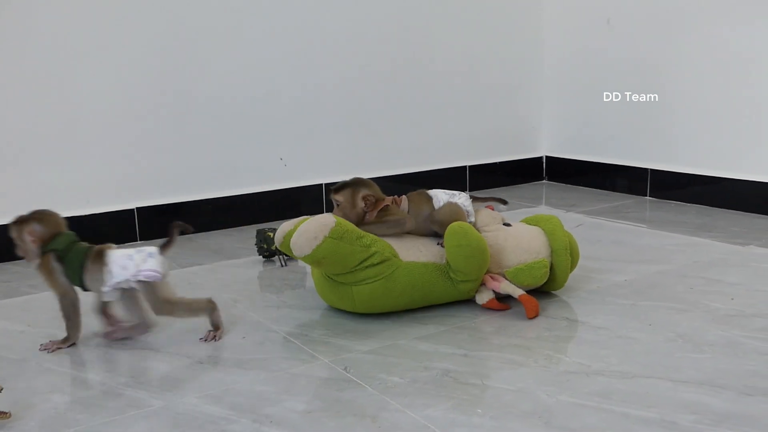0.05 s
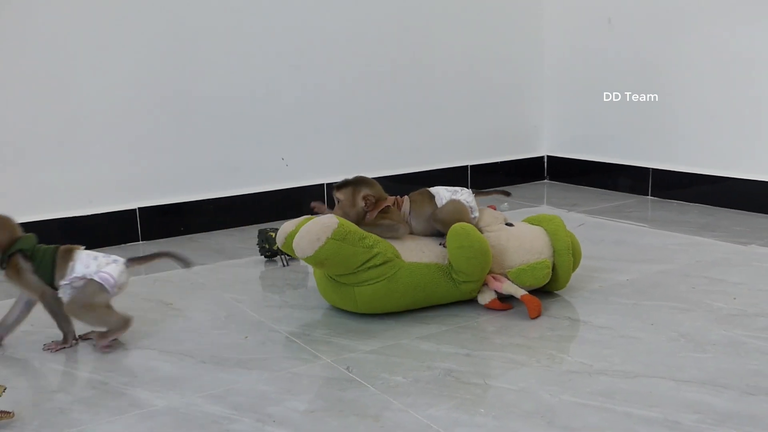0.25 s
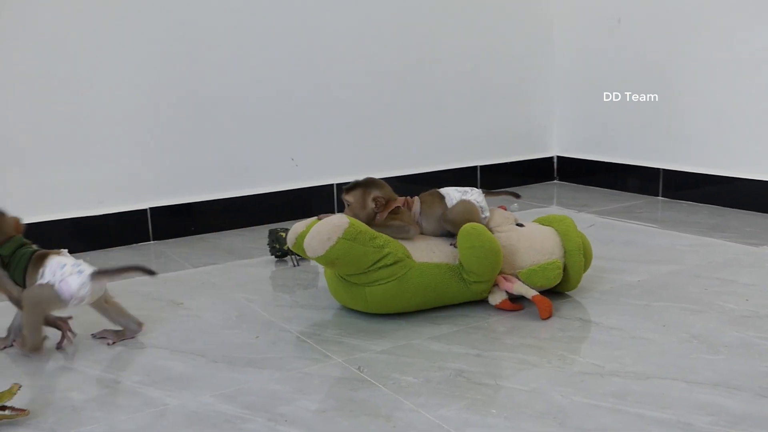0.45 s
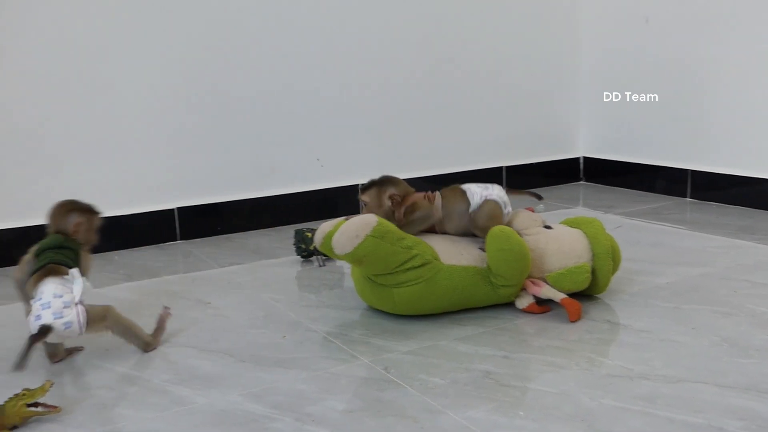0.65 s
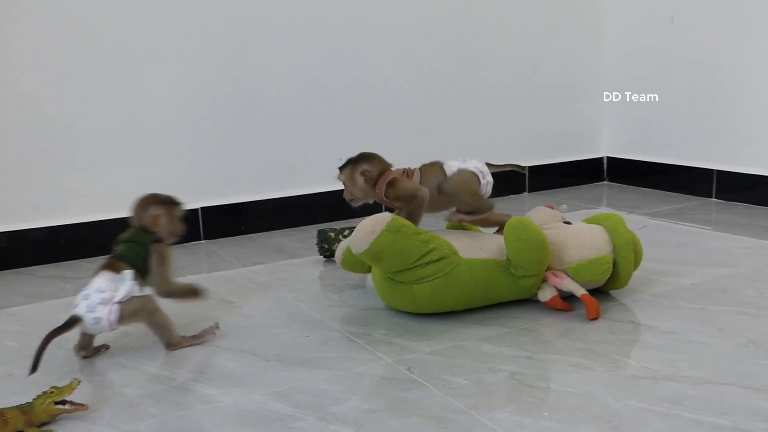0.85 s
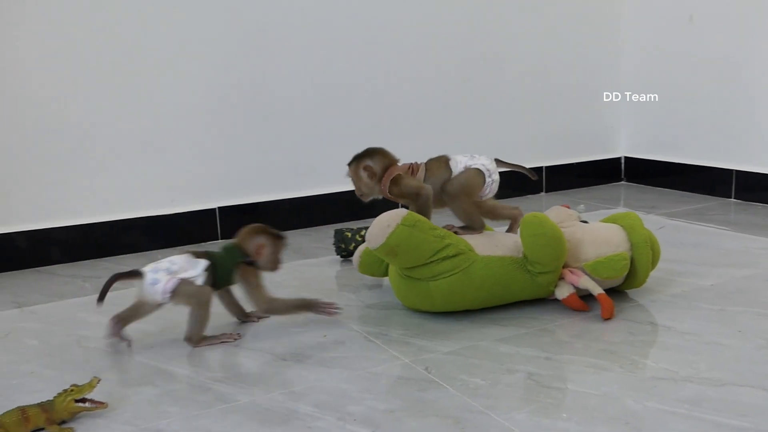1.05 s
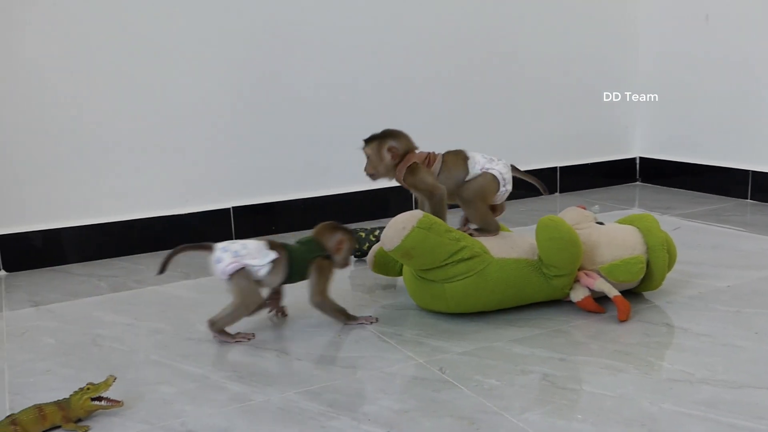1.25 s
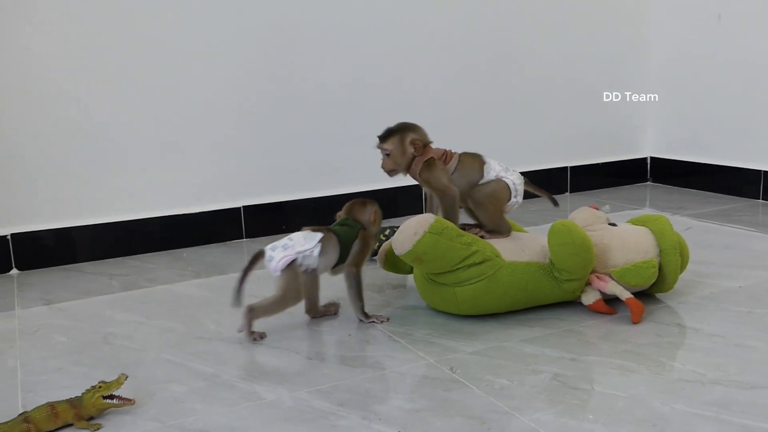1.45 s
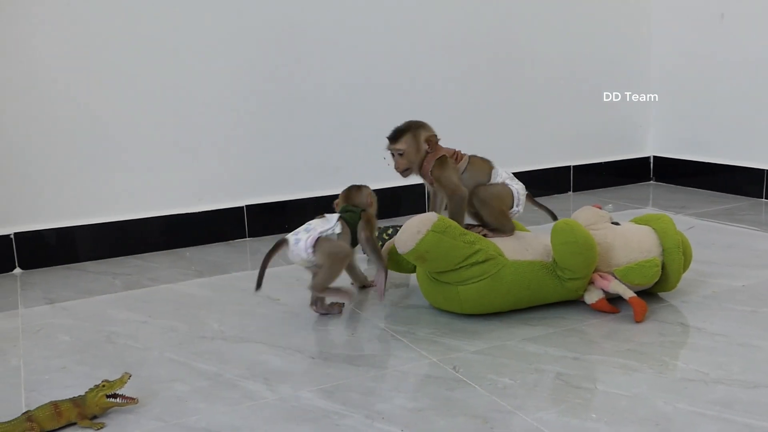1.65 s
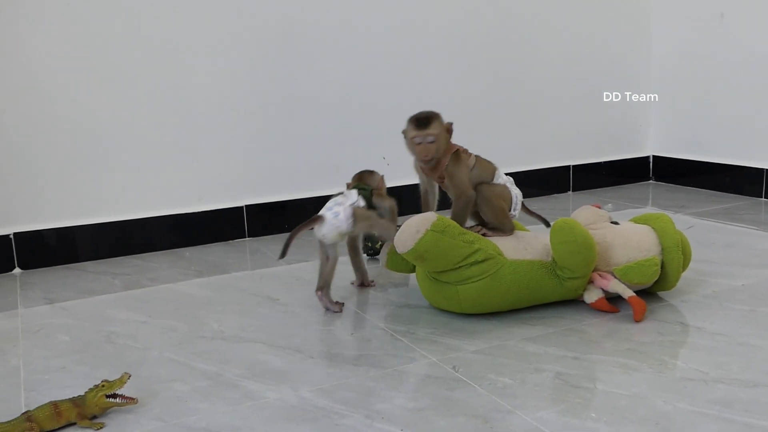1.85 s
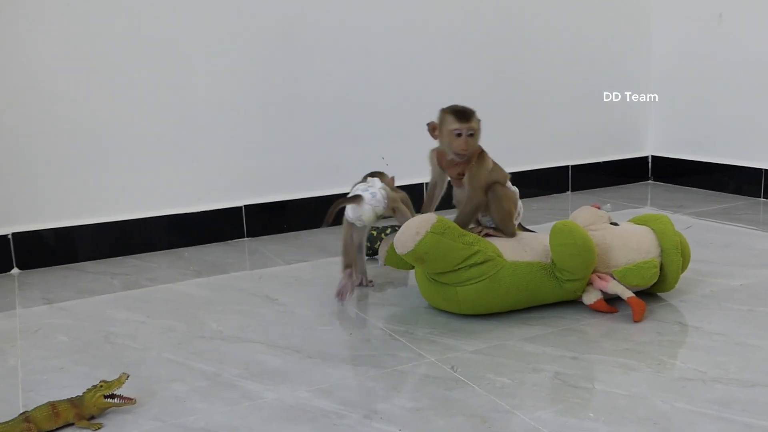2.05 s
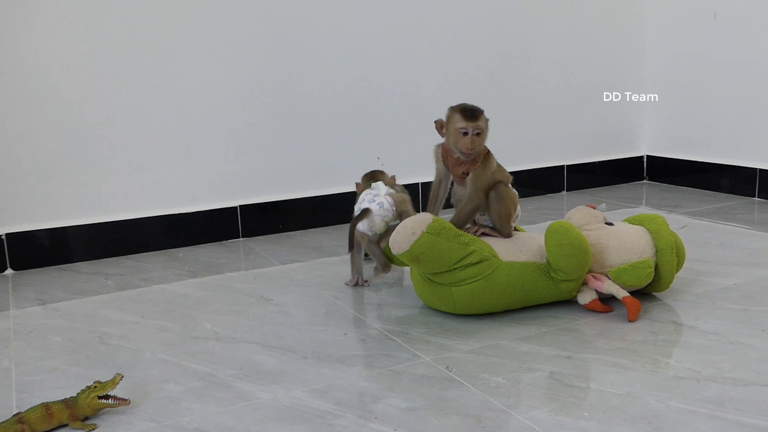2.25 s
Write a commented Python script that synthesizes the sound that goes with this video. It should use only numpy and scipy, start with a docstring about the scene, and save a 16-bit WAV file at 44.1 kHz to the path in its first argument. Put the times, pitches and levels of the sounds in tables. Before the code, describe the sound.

Piercing monkey squeals come in two brief bursts with a weak squeak between, each leaving a bright echo off hard walls; low traffic swells and quiet room tone lie behind, heard in wide stereo from some distance.

```python
"""In a bare tiled room with a long bright echo, young monkeys squeal, after the fading echo of an earlier squeal.
Each squeal is a stack of shaking partials mixed with pulsing breath noise and coloured by a moving mouth.
Behind them shaped noise makes distant swelling traffic, a lumpy rumble and steady room tone;
the microphone pair hears the low background almost in opposite phase. A thin far whistle, nearly a sine, passes."""
import sys
import numpy as np
from scipy import signal
from scipy.fft import rfft, irfft
from scipy.io import wavfile
from scipy.ndimage import uniform_filter1d

SR = 44100
rng = np.random.default_rng(int(sys.argv[2]) if len(sys.argv) > 2 else 0)


def convert_level_to_amplitude(level_db):
    """Map a level in decibels to its linear amplitude factor."""
    exponent = np.asarray(level_db, float) / 20
    return 10 ** exponent


def master(y):
    """Save y as 16-bit WAV."""
    cut = np.clip(np.atleast_2d(y).T, -1, 1)
    pcm = np.round(cut * 32767)  # scale
    wavfile.write(sys.argv[1], SR, pcm.astype(np.int16))


N = 101429   # length in samples


def rms_one(x):
    """Scale to rms 1."""
    return x / np.sqrt(np.mean(x ** 2) + 1e-20)


def at_hz(points, hz):
    """Read the second column of a table on a log-frequency axis."""
    table = np.array(points)
    return np.interp(np.log(hz + 1), np.log(table[:, 0]), table[:, 1])


def drift(rate_hz, size):
    """Slow random movement of rms 1: white noise through two equal one-pole low-passes."""
    r = np.exp(-2 * np.pi * rate_hz / SR)
    slow = signal.lfilter([1], [1, -2 * r, r * r], rng.standard_normal(size + SR))
    return rms_one(slow[SR:])   # the first second lets the filter settle


def band_pass(x, low_hz, high_hz):
    """Keep one band of a sound with a Butterworth filter."""
    return signal.sosfilt(signal.butter(2, [low_hz, high_hz], "band", fs=SR, output="sos"), x)


def coloured(x, spectrum):
    """Shape a sound by a dB spectrum."""
    size = x.shape[-1]
    hz = np.arange(size // 2 + 1) * SR / size
    return irfft(rfft(x) * convert_level_to_amplitude(at_hz(spectrum, hz)), size)


MOST_OPPOSED = -0.86   # lowest left-right likeness; -1 would be exact opposite phase


def pair(mid, side, likeness, balance):
    """Left and right from two unrelated sounds: their mid/side mix sets likeness and balance per frequency."""
    size = len(mid)
    hz = np.arange(size // 2 + 1) * SR / size
    alike = np.clip(at_hz(likeness, hz), MOST_OPPOSED, 1)
    lean = convert_level_to_amplitude(at_hz(balance, hz) / 2)
    m = np.sqrt(0.5 + alike / 2) * rfft(mid)
    s = np.sqrt(0.5 - alike / 2) * rfft(side)
    return irfft(np.array([(m + s) * lean, (m - s) / lean]), size)


# stereo image of the room, shared by both echoes: f/Hz, left-right likeness
ROOM_LIKENESS = [(700, 0.36), (1100, 0.00059), (1600, 0.24), (3100, 0.83), (4200, 0.87), (6000, 1),
                 (7800, 0.93), (9000, 0.76), (12000, 0.32), (15000, 0.39)]
# lean of the room: f/Hz, left minus right level/dB
ROOM_BALANCE = [(700, 22), (1300, -14), (2400, -6), (4400, 0.5), (8000, -2), (15000, -0.5)]
EARLIER_HZ, EARLIER_WIDTH_HZ, EARLIER_T60_S = 6640, 1300, 0.75
EARLIER_DB, EARLIER_WIDE_DB = -60.5, -63   # narrow and wide noise, before the decay


def earlier_echo():
    """The dying echo of a high squeal that ended just before: two bands of noise in exponential decay."""
    white = rng.standard_normal((2, 2, N))
    half_width = EARLIER_WIDTH_HZ / 2
    narrow = band_pass(white[0], EARLIER_HZ - half_width, EARLIER_HZ + half_width)
    wide = band_pass(white[1], 3500, 11000)
    both = convert_level_to_amplitude(EARLIER_DB) * rms_one(narrow) + convert_level_to_amplitude(EARLIER_WIDE_DB) * rms_one(wide)
    decay = convert_level_to_amplitude(-60 * np.arange(N) / SR / EARLIER_T60_S)
    return pair(both[0], both[1], ROOM_LIKENESS, ROOM_BALANCE) * decay


# traffic swells: t/s, level/dB, extra left minus right level/dB for the whole background
TRAFFIC = [(0, -60, 4.5), (.3, -55, 6), (.6, -58.5, 6), (.9, -58, 3), (1.2, -58.5, 1.5), (1.45, -56.5, 2.5),
           (1.65, -52, 3.7), (1.95, -53.5, 3), (2.12, -51.5, 2.1), (2.3, -50.5, 3.1)]
# traffic tone: f/Hz, relative level/dB per Hz
TRAFFIC_COLOUR = [(25, -51), (45, -38), (100, -22.5), (180, -5), (230, -5.5), (300, -4.5), (700, -5),
                  (1300, -7.5), (2200, -17), (4000, -23), (8000, -29), (16000, -36.5)]
# room tone: f/Hz, relative level/dB per Hz
HISS_COLOUR = [(25, -19), (1000, 11), (4000, 9.2), (8000, -7.5), (11000, 4), (16000, -30)]
# stereo image of the background: f/Hz, left-right likeness (held at MOST_OPPOSED or above)
FAR_LIKENESS = [(60, -1.9), (130, -0.75), (290, -0.92), (640, -1.062), (1410, -0.78), (3100, -0.34),
                (6820, 0.41), (15000, 0.56)]
# lean of the background: f/Hz, left minus right level/dB
FAR_BALANCE = [(60, -4.5), (180, -8), (550, -9), (1650, -6.5), (4970, -4.5), (15000, 7)]
HISS_DB = -73.5
RUMBLE_TOP_HZ, RUMBLE_DB = 147, -75
RUMBLE_LUMPS_DB, RUMBLE_LUMPS_HZ = 2.5, 6   # depth (rms) and speed of the rumble's swells


def background():
    """Swelling traffic and a lumpy rumble over a steady room tone, all shaped noise."""
    s, level_db, lean_db = np.transpose(TRAFFIC)
    t = np.arange(N) / SR
    white = rng.standard_normal((4, N))
    traffic_db = np.interp(t, s, level_db) + 0.4 * drift(18, N)
    traffic = rms_one(coloured(white[:2], TRAFFIC_COLOUR)) * convert_level_to_amplitude(traffic_db)
    hiss = convert_level_to_amplitude(HISS_DB) * rms_one(coloured(white[2:], HISS_COLOUR))
    low = band_pass(white[2:, ::-1], 60, RUMBLE_TOP_HZ)   # reversed, so unlike the hiss
    rumble = rms_one(low) * convert_level_to_amplitude(RUMBLE_DB + RUMBLE_LUMPS_DB * drift(RUMBLE_LUMPS_HZ, N))
    far = traffic + hiss + rumble
    lean = convert_level_to_amplitude(np.interp(t, s, lean_db) * np.array([[0.5], [-0.5]]))
    return pair(far[0], far[1], FAR_LIKENESS, FAR_BALANCE) * lean


SHAKE, SHAKE_HZ = 0.1235, 202.4   # pitch shake at full roughness (rms share of pitch) and its speed
BREATH_DB = 5.0   # gain of the breath noise at full roughness
SHIMMER_DB, SHIMMER_HZ = 2.5, 75   # the strained voice wavers in strength: depth (rms) and speed
DULLING = 0.3   # treble loss for each dB under the squeal's peak, times log2(1 + f / 1 kHz), in dB
# one table per squeal: t/s, pitch f/Hz, level/dB, roughness (0-1), half-pitch line level/dB,
# mouth resonance shift (1 = none)
SQUEALS = [
    [(.136, 2243, -75, 0.1, -32, 0.42), (.146, 2554, -52.5, 0.17, -30, 1.07),
     (.158, 3068, -47.5, 0.31, -10, 0.99), (.172, 2857, -42, 0.49, 6, 0.97),
     (.185, 2675, -41.5, 0.48, -5, 0.97), (.2, 2668, -44.5, 0.59, -4, 0.99), (.21, 2700, -67, 0.7, -3, 1.3)],
    [(.216, 1518, -62, 0.11, -17, 0.43), (.228, 1636, -42, 0.25, -12, 1.09),
     (.245, 1592, -38, 0.34, -2, 1.02), (.27, 1623, -38, 0.28, -5, 1.03),
     (.288, 1664, -35, 0.36, -15, 1.01), (.296, 1670, -77, 0.1, -18, 3)],
    [(.284, 5570, -63, 0, -30, 0.87), (.295, 5640, -42.5, 0.2, -39, 1.1), (.325, 5880, -46, .15, -37, 1.3),
     (.335, 5920, -51, 0, -30, 1.3)],
    [(.308, 1629, -86, 0.25, -23, .98), (.322, 1682, -34.5, 0.3, -11, 1.15),
     (.335, 1647, -38, 0.39, -23, 0.99), (.35, 1722, -35, 0.38, -36, 1.032),
     (.385, 1606, -35.5, 0.3, -29, 0.934), (.395, 1647, -49, 0.18, -17, 0.77)],
    [(.697, 1469, -80, 0.04, -24, 1.7), (.71, 1486, -51.5, 0.12, -3, 1.03),
     (.722, 1529, -53, 0.1, -5, 1.03), (.733, 1606, -53.5, 0.15, -21, 1.08),
     (.746, 1687, -50, 0.2, -2, 1.03), (.757, 1860, -93, 0, 9.5, 0.63)],
    [(1.472, 814.3, -67, 0, -30, 0.79), (1.488, 833, -57, .03, -30, 0.82), (1.5, 974, -50, 0.2, -27, 0.94),
     (1.512, 1107, -43.5, 0.23, -28, 1.044), (1.526, 1208, -39.5, 0.37, -34, 1.085),
     (1.538, 1220, -77, 0.2, -30, 0.79)],
    [(1.518, 1906, -78, 0.28, -6, 1.35), (1.53, 1930, -45, 0.17, -11, 1.1),
     (1.543, 1970, -38.5, 0.23, 0.5, 1.07), (1.552, 2024, -52, 0.27, -10, 1.08),
     (1.562, 2002, -42.5, 0.33, -10, 1.2), (1.582, 2142, -49, 0.29, -4, 1.22),
     (1.59, 2200, -74, .45, -5, 1.4)],
    [(1.57, 2182, -50, 0.57, -15, 1.38), (1.59, 2450, -40, 0.3, -2, 0.91),
     (1.615, 2553, -42, 0.42, -4, 1.08), (1.635, 2624, -53, .5, 3, 0.82), (1.65, 2510, -70, 0.4, -16, 0.37)],
]
# mouth resonances, one table per squeal: f/Hz, level/dB
MOUTHS = [
    [(700, -36.5), (1000, -11.5), (1350, -28.5), (1800, -6.5), (2200, -11.5), (2750, -7), (4000, -22),
     (5240, -11.5), (7700, -23), (9000, -13.5), (12500, -22), (15500, -47)],
    [(750, -35), (1050, -42), (1630, -10.5), (2000, -18), (3250, -5), (4200, -12.5), (4950, -7),
     (6500, -8.5), (7900, -14), (9500, -4.5), (13000, -15.5), (15500, -34)],
    [(700, -32), (5700, 9), (15000, -28)],
    [(700, -63), (1680, -17), (2200, -16.5), (2800, -10.5), (3350, -1.8), (4300, -13), (6300, -9.5),
     (8000, -20), (10200, -12), (13000, -24), (15500, -30)],
    [(500, -31), (780, -11), (1200, -29), (1650, -4.5), (2300, -15), (3000, -13.5), (3900, -11.5),
     (4700, -8.5), (5500, -15), (6600, -17.5), (10000, -22), (15500, -45)],
    [(500, -56), (900, -2.5), (1200, -9), (1600, -13), (2200, -12.5), (2800, -20), (3600, 0), (5000, -28),
     (7300, -19.5), (9300, -25.5), (11200, -11), (15000, -50)],
    [(600, -36), (1000, -15.5), (1450, -21), (1900, -2), (2700, -21), (4200, -9), (5400, -25), (7600, -14),
     (9000, -25), (10800, -12.5), (12500, -33), (15000, -72)],
    [(600, -36), (1230, -12.5), (1700, -25), (2400, -1.5), (3200, -21), (5000, -4), (6700, -21.5),
     (8700, -8.5), (9800, -13), (11300, -9), (13000, -22), (15000, -46)],
]


def squeal(rows, mouth):
    """A stack of shaking partials with half-pitch lines, breath gated by each cycle, through the moving mouth."""
    s, hz, level_db, rough, half_db, shift = np.transpose(rows)
    size = 8192
    start = int(s[0] * SR)
    t = (start + np.arange(size)) / SR
    rough = np.clip(np.interp(t, s, rough), 0, 1)
    half = convert_level_to_amplitude(np.interp(t, s, half_db))
    hz = np.interp(t, s, hz) * (1 + SHAKE * rough * drift(SHAKE_HZ, size))

    # partials of half the pitch: the odd ones are the half-pitch lines
    half_phase = np.pi * np.cumsum(hz) / SR
    k = np.arange(1, 41)[:, None]
    strength = np.where(k % 2, half, 1) * (k * hz / 2 < 0.4 * SR)
    tone = np.sum(strength * np.sin(k * half_phase + k * k), axis=0)
    breath = rng.standard_normal(size) * (1 + np.cos(2 * half_phase))
    source = (1 - rough) * rms_one(tone) + rough * convert_level_to_amplitude(BREATH_DB) * breath

    # the mouth resonances slide with the shift, and softer moments are duller
    f, frame_s, frames = signal.stft(source, SR, nperseg=384)
    f, frame_s = f[:, None], frame_s + start / SR
    under_peak_db = np.interp(frame_s, s, level_db) - level_db.max()
    dull_db = DULLING * np.log2(f / 1000 + 1) * under_peak_db
    mouth_db = at_hz(mouth, f / np.interp(frame_s, s, shift))
    voice = signal.istft(frames * convert_level_to_amplitude(mouth_db + dull_db), SR)[1][:size]

    # level out over 10 ms, then follow the level column
    loudness = np.sqrt(uniform_filter1d(voice ** 2, size=441) + 1e-14)
    strength_db = np.interp(t, s, level_db) + SHIMMER_DB * drift(SHIMMER_HZ, size)
    out = np.zeros(N + size)
    out[start:start + size] = voice / loudness * convert_level_to_amplitude(strength_db) * (t < s[-1])
    return out[:N]


# decay of the tiled room: f/Hz, time to fall 60 dB/s
ROOM_T60 = [(300, 0.34), (1500, 0.87), (3000, 0.99), (6000, 0.77), (10000, 0.89), (15000, 0.15)]
DIRECT_DB, BUILD_UP_S = -1.5, 0.002
DIRECT_SIDE = -0.33   # direct sound fed to side per unit of mid; negative puts the voices to the right
EARLY_S, EARLY_DB = 0.14, 1.5   # the first reflections stand above the later tail


def room(x):
    """A direct sound and a dense tail: bands of noise that each die at their own rate, convolved with the voices."""
    t, tail = np.arange(SR) / SR, 0
    white = rng.standard_normal((2, 2, SR))
    edges = 300 * 2 ** np.arange(0, 6.1, 0.5)   # half-octave bands
    for k, (low, high) in enumerate(zip(edges, edges[1:])):
        t60 = at_hz(ROOM_T60, np.sqrt(low * high))
        band = band_pass(white[k % 2], low, high)   # neighbours use unrelated noise
        even_energy = np.sqrt(2 * np.log(1000) / t60 / SR)   # long and short decays carry equal energy
        tail = tail + band * convert_level_to_amplitude(-60 * t / t60) * even_energy
    early_db = EARLY_DB / (1 + np.exp((t - EARLY_S) * 200))
    tail = tail * (1 - np.exp(-t / BUILD_UP_S)) * convert_level_to_amplitude(early_db)
    tail[:, 64] += convert_level_to_amplitude(DIRECT_DB) * np.array([1, DIRECT_SIDE])   # 64 samples in, trimmed off below
    ears = pair(tail[0], tail[1], ROOM_LIKENESS, ROOM_BALANCE)
    return signal.fftconvolve(ears, x[None], axes=1)[:, 64:N + 64]


# a thin far whistle: t/s, f/Hz, level/dB
WHISTLE = [(0.941, 10000, -100), (.96, 10000, -80), (1.051, 9500, -77), (1.075, 9600, -100)]


def whistle():
    """A near sine whose pitch wavers a little."""
    s, hz, level_db = np.transpose(WHISTLE)
    t = np.arange(N) / SR
    hz = np.interp(t, s, hz) * (1 + 0.0035 * drift(60, N))
    return np.sin(2 * np.pi * np.cumsum(hz) / SR) * convert_level_to_amplitude(np.interp(t, s, level_db, -140, -140))


def scene():
    """Squeals in the room, the earlier echo and the whistle over the background."""
    voices = sum(squeal(rows, mouth) for rows, mouth in zip(SQUEALS, MOUTHS))
    whistle_gain = convert_level_to_amplitude(np.array([[-4], [0]]))   # left 4 dB softer
    return earlier_echo() + background() + room(voices) + whistle() * whistle_gain


def low_pass(x):
    """Removes everything above the highest recorded frequency."""
    return signal.sosfilt(signal.butter(12, 15610, fs=SR, output="sos"), x)


NOTCH_HZ, NOTCH_WIDTH_HZ = 7710, 220   # dip of the microphone housing


def record(dry):
    """The microphone housing cuts a narrow dip in the treble: a resonant band is subtracted."""
    b, a = signal.iirpeak(NOTCH_HZ, NOTCH_HZ / NOTCH_WIDTH_HZ, fs=SR)
    mix = dry - signal.lfilter(b, a, dry)
    return low_pass(mix)


dry = scene()
out = record(dry)
master(out)
```